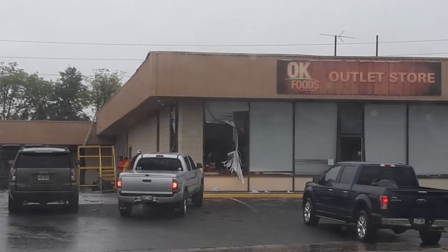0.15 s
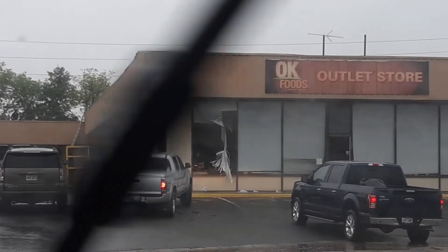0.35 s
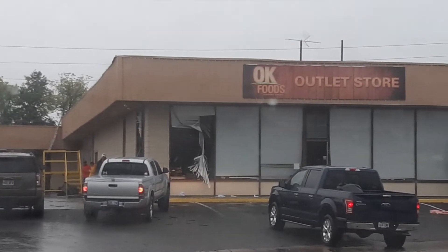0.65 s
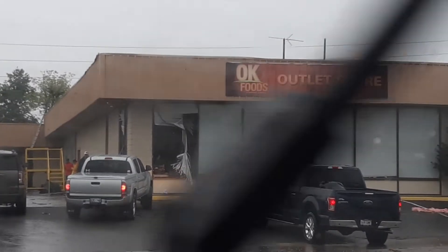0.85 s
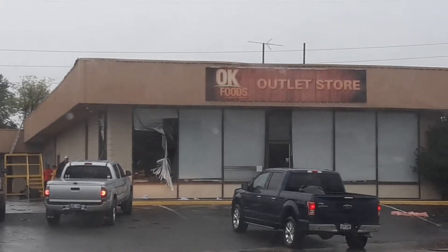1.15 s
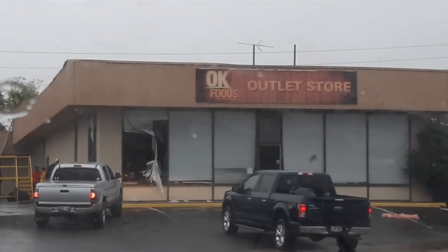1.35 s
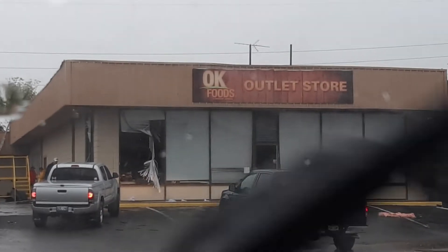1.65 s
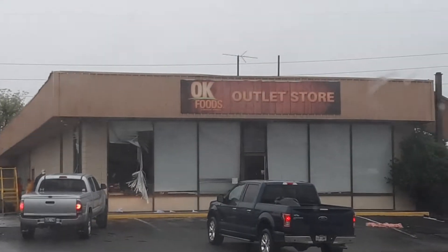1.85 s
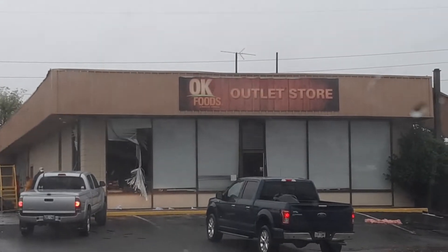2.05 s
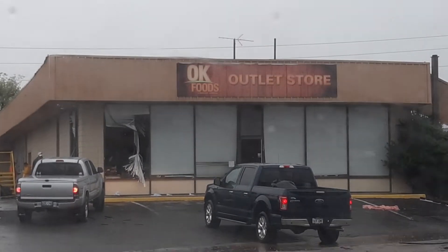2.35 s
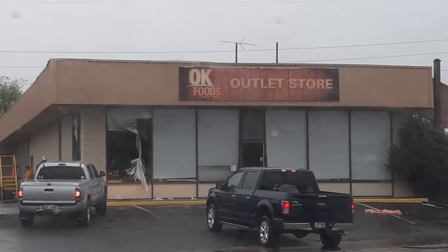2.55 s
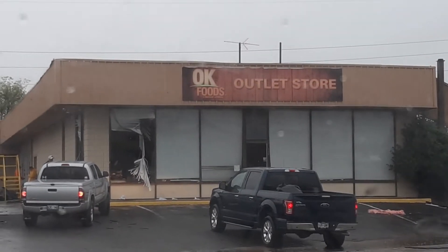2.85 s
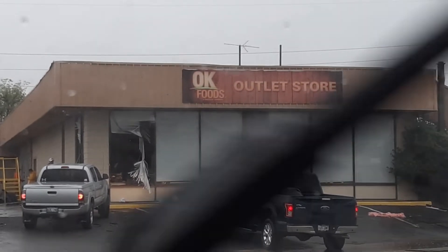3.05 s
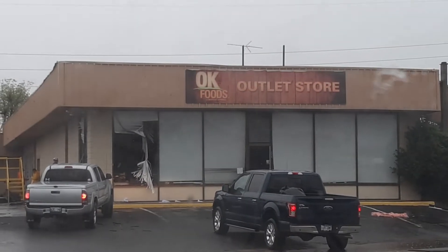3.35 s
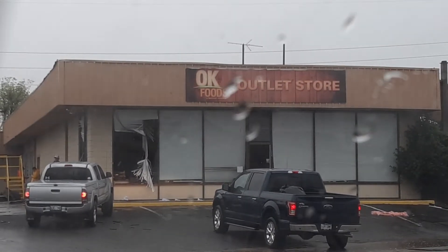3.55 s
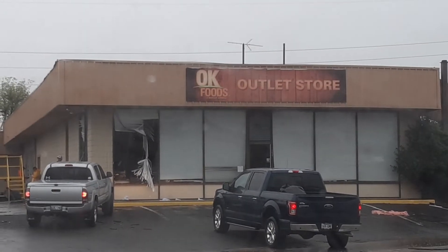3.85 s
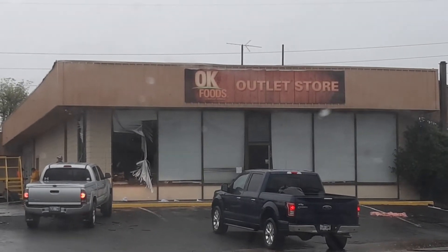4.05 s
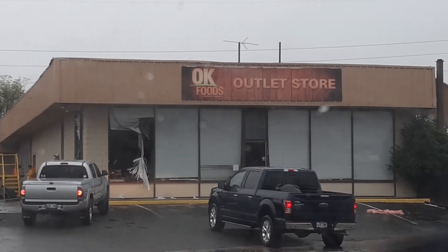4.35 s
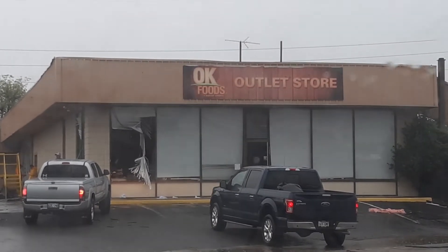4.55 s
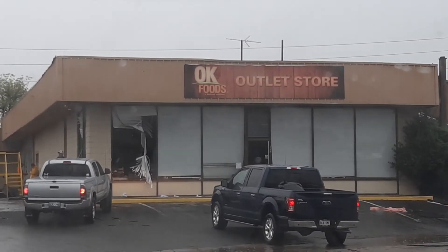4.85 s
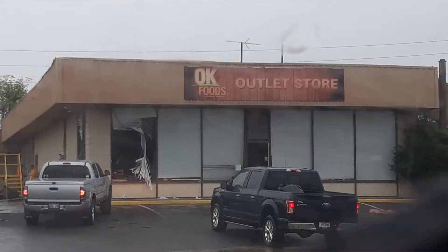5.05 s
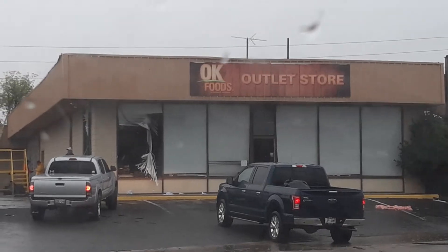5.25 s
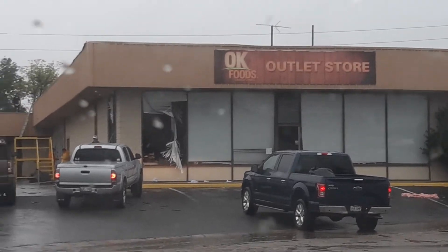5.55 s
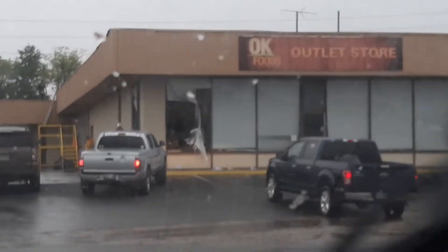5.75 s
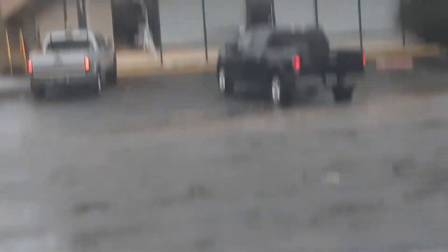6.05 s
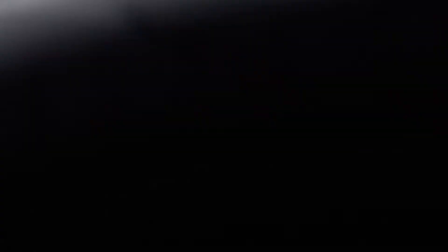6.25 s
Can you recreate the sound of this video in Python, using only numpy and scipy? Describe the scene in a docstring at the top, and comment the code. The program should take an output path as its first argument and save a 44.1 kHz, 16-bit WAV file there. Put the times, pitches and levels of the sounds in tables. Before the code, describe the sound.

Inside an idling car in the rain, wiper blades thump, then groan and judder across wet glass every second and a half while drops tick.

```python
"""Inside a parked car in the rain, two microphones in the cabin, the engine idling as a firing tone over noise.
The wiper blades set off with a thump, rub and judder over wet glass as clicks ringing its modes, and thump
again as they turn. Drops tick on glass and roof as noise bursts; close to the microphones a jacket rustles
and snaps, made of crackles and clicks. Something small and metallic rattles once, as clicks through resonances."""
import sys
import numpy as np
from scipy import signal
from scipy.fft import rfft, irfft, next_fast_len
from scipy.io import wavfile

SR = 44100
rng = np.random.default_rng(int(sys.argv[2]) if len(sys.argv) > 2 else 0)


def inscribe(sig):
    """Save sig as 16-bit PCM at rate SR to the path in sys.argv[1].

    A 1-D sig is mono; a 2-D sig holds one channel per row.
    Samples are clipped to [-1, 1] before scaling.
    """
    pcm = np.round(np.clip(np.atleast_2d(sig).T, -1, 1) * 32767)
    wavfile.write(sys.argv[1], SR, pcm.astype(np.int16))


N = 282681  # length in samples


def amp(db):
    """Decibels to gain."""
    return 10 ** (np.asarray(db) / 20)


def rms_one(x):
    """Scaled to unit rms."""
    return x / np.sqrt(np.mean(x ** 2) + 1e-20)


def in_time(rows):
    """Columns of a curve table, one value a sample."""
    s, *columns = np.transpose(rows)
    t = np.arange(N) / SR
    return [np.interp(t, s, column) for column in columns]


def passing(rows):
    """Gain of a level curve, silent outside it."""
    t = np.arange(N) / SR
    return amp(in_time(rows)[0]) * (t >= rows[0][0]) * (t < rows[-1][0])


def at_hz(points, hz):
    """Value of a spectrum table, log-frequency axis."""
    points = np.array(points)
    return np.interp(np.log(hz), np.log(points[:, 0]), points[:, 1])


def coloured(x, spectrum):
    """Filtered by the causal (minimum-phase) response of a spectrum table."""
    log_gain = np.log(amp(at_hz(spectrum, np.fft.rfftfreq(8192, 1 / SR) + 1)))
    # folding the cepstrum onto positive time makes the response causal
    cepstrum = irfft(log_gain)
    cepstrum[1:4096] *= 2
    cepstrum[4097:] = 0
    response = irfft(np.exp(rfft(cepstrum)))
    return signal.fftconvolve(np.atleast_2d(x), response[None], axes=1)[:, :N]


def modes(x, table):
    """Parallel resonances of alternating sign."""
    out = 0
    for k, (hz, width_hz, level_db) in enumerate(table):
        r = np.exp(-np.pi * width_hz / SR)
        b = (1 - r * r) / 2 * np.array([1, 0, -1])
        a = [1, -2 * r * np.cos(2 * np.pi * hz / SR), r * r]
        out = out + (-1) ** k * amp(level_db) * signal.lfilter(b, a, x)
    return out


def drift(rate_hz):
    """Slow random wander of spread 1, drawn at every 40th sample."""
    r = np.exp(-80 * np.pi * rate_hz / SR)
    noise = rng.standard_normal(N // 40 + 2002)
    slow = signal.lfilter([1], [1, -2 * r, r * r], noise)[2000:]  # past the settling
    return np.interp(np.arange(N) / 40, np.arange(len(slow)), rms_one(slow))


def grains(per_s, spread_db):
    """Random clicks of uneven size and random sign."""
    sizes = amp(spread_db * np.minimum(rng.exponential(1, N), 4)) * rng.choice([-1, 1], N)
    return sizes * (rng.random(N) < per_s / SR)


def add(out, s, sound):
    """Mixes a short sound in at s seconds."""
    i = max(round(s * SR), 0)
    out[..., i:i + sound.shape[-1]] += sound[..., :N - i]


def bursts(events, attack_s):
    """Envelope of short bursts from rows of (s, dB, t60 s)."""
    out, t = np.zeros(N), np.arange(round(.2 * SR)) / SR
    for s, level_db, t60 in events:
        add(out, s, (1 - np.exp(-t / attack_s)) * amp(level_db - 60 * t / max(t60, .005)))
    return out


# How alike the two microphones hear a sound. Each row: Hz, left-right likeness from 0 to 1.
LIKENESS = [(40, .9992), (80, .997), (180, .975), (300, .986), (600, .983), (1200, .8), (4000, .88),
            (15000, .82)]


def wide(x):
    """Two channels of a random excitation; what they do not share is the same grains with new signs."""
    share = [(hz, 10 * np.log10(np.clip((1 - c) / (1 + c), 1e-4, 1))) for hz, c in LIKENESS]
    difference = coloured(x * rng.choice([-1, 1], N), share)
    return x + difference * np.array([[1], [-1]])


# Level of the idle's firing tone in the cabin. Each row: time in seconds, level in dB.
FIRING_LEVEL = [(0.0, -47), (0.09, -43), (0.3, -49), (1.98, -45), (2.08, -48), (3.21, -49), (3.55, -47),
                (3.78, -42), (4.28, -50), (5.24, -44), (5.61, -51), (5.79, -46), (6.35, -41), (6.4, -50)]
# Overtones of the firing tone. Each row: multiple of the firing rate, level in dB re the firing tone.
FIRING_OVERTONES = [(2, -14), (3, -15)]
# Colour of engine rumble and fine rain inside the car. Each row: Hz, relative dB per Hz.
CABIN_COLOUR = [(26, -54), (45, -9.5), (122, 7), (237, -7.5), (405, -7), (505, -12), (676, -11.5),
                (822, -27.5), (976, -18.5), (1890, -28.5), (4120, -30), (6880, -35), (7970, -44.5),
                (10900, -39.5), (15400, -41.5)]
# Faint hum in the cabin. Each row: Hz, width in Hz, relative level in dB.
HUM_MODES = [(476, 28, 11), (744, 27, -10)]
IDLE_HZ, CABIN_DB = 40.4, -38  # mean firing rate; level of the rumble and rain bed


def engine():
    """Firing tone with two overtones over a lumpy rumble that gives way to fine rain hiss higher up."""
    level_db, = in_time(FIRING_LEVEL)
    turn = 2 * np.pi * np.cumsum(IDLE_HZ + 0.535 * drift(3.0)) / SR
    overtones = sum(amp(db + 1.7 * drift(5.3)) * np.sin(k * turn) for k, db in FIRING_OVERTONES)
    tone = np.sin(turn) + overtones
    air = wide(rng.standard_normal(N))
    bed = rms_one(coloured(air, CABIN_COLOUR)) * amp(1.3 * drift(9))
    hum = amp(-13.5) * rms_one(modes(air, HUM_MODES))
    return np.sqrt(2) * amp(level_db) * tone + amp(CABIN_DB) * (bed + hum)


# The jacket moving near the microphones. Each row: time in seconds, level in dB.
RUSTLE_LEVEL = [(0, -47), (0.33, -41.5), (0.6, -48), (0.9, -47), (1.3, -50), (1.75, -43.5), (2.05, -46.5),
                (2.22, -61), (2.4, -70)]
# Colour of the creasing cloth. Each row: Hz, relative dB per Hz.
RUSTLE_COLOUR = [(880, -64), (1500, -28), (1980, -2), (2560, -5), (3740, 7.5), (4130, 5.5), (5460, -10),
                 (6600, -8.5), (7630, -56), (9910, -11.5), (13000, -42)]
# The sleeve catches. Each row: start in seconds, level in dB, 60 dB decay time in seconds.
SLEEVE_CATCHES = [(5.94, -35, 0.13), (5.995, -28.5, 0.14), (6.043, -37.5, 0.19)]
# The sleeve slides past. Each row: time in seconds, level in dB.
SLEEVE_LEVEL = [(5.93, -42), (5.99, -43), (6.04, -48), (6.08, -40.5), (6.165, -38), (6.18, -47),
                (6.22, -50)]
# Bright colour of the sliding sleeve. Each row: Hz, relative dB per Hz.
SLEEVE_COLOUR = [(2650, -8.5), (4500, -5.5), (5040, -3.5), (6520, -3.5), (7520, -23), (9130, -12),
                 (10200, -10), (14000, -27)]


def jacket():
    """Stiff cloth creases in clumps of tiny crackles; a sleeve catches three times and slides by with a hiss."""
    clumps = amp(6.5 * drift(25))
    crackles = wide(grains(2500 * clumps, spread_db=6.0))
    rustle = passing(RUSTLE_LEVEL) * rms_one(coloured(crackles, RUSTLE_COLOUR))
    fibres = wide(grains(14000, spread_db=4.5))
    dull = rms_one(modes(fibres, [(3440, 770, 1.0), (5400, 1400, -7.5)]))
    bright = rms_one(coloured(fibres, SLEEVE_COLOUR))
    catches = bursts(SLEEVE_CATCHES, attack_s=0.0023) * dull
    slide = passing(SLEEVE_LEVEL) * bright
    return (rustle + catches + slide) * amp([[-.7], [.7]])  # a little to the right


# Rubbing strokes of the blades.
# Each row: start in seconds, length in seconds, then level, grip and singing in dB re the usual stroke.
STROKES = [(0.009, 0.57, 0.7, 2, 3.5), (1.39, .57, 0.46, 2.5, 4.5), (2.767, 0.593, -0.7, 2.5, 5),
           (4.144, 0.555, 0.4, 0, -5), (5.527, 0.58, 0, 2, -2)]


def current(t):
    """Seconds since the latest stroke began, and the rest of that stroke's row."""
    rows = np.array(STROKES)
    latest = np.maximum(np.searchsorted(rows[:, 0], t) - 1, 0)
    row = rows[latest].T
    return t - row[0], row[1:]


# Seconds into a stroke: the rubber grips ever harder, then lets go; the grip fades over SLIP_S.
GRIP_FROM_S, GRIP_FULL_S, LET_GO_S, SLIP_S = 0.11, 0.31, 0.3495, 0.095
ATTACK_S, RELEASE_S = 0.04, 0.047  # the blade gets going; it stops
# The singing mode builds up later and is choked within SING_STOP_S.
SING_FROM_S, SING_FULL_S, SING_STOP_S = .2, 0.28, 0.027


def stroke(since, length_s):
    """Contact, grip and singing build-up (all 0-1) by seconds since the start of a stroke."""
    contact = np.clip(np.minimum(since / ATTACK_S, 1 - (since - length_s) / RELEASE_S), 0, 1)
    gripping = (since - GRIP_FROM_S) / (GRIP_FULL_S - GRIP_FROM_S)
    held = 1 - (since - LET_GO_S) / SLIP_S
    grip = np.clip(np.minimum(gripping, held), 0, 1)
    building = (since - SING_FROM_S) / (SING_FULL_S - SING_FROM_S)
    choked = 1 - (since - LET_GO_S) / SING_STOP_S
    sing = np.clip(np.minimum(building, choked), 0, 1)
    return contact, grip, sing


def steadied(x, share):
    """Friction feeds a ring that fades and brakes one that grows, which evens its height."""
    height = np.abs(signal.hilbert(x.mean(axis=0), next_fast_len(N)))[:N]
    return rms_one(x / (height / height.mean() + 0.087) ** np.clip(share, 0, 1))


# Low modes of the glass. Each row: Hz, width in Hz, relative level in dB.
GROAN_MODES = [(184, 138, -9), (263.6, 36, -1.5), (306.2, 25.7, -1), (352.6, 40.7, -2.5), (383.4, 81, -8.5)]
# Higher modes of the glass. Each row: Hz, width in Hz, relative level in dB.
UPPER_MODES = [(464, 66, -13), (620, 163, 3), (689, 71, 4.5)]
# The mode that sings at full blade speed. Each row: Hz, width in Hz, relative level in dB.
SINGING_MODE = [(549.4, 35, 0)]
# Colour of the blade's swish. Each row: Hz, relative dB per Hz.
SWISH_COLOUR = [(470, -24.5), (800, 3), (1200, -1.5), (1270, -7.5), (2220, -11), (2590, -16.5),
                (3880, -14.5), (6580, -26), (7810, -40.5), (9000, -32.5), (11700, -63), (19800, -120)]
GROAN_DB, UPPER_DB, SINGING_DB, SWISH_DB = -29, -38, -45.5, -48  # light rubbing
# Usual rise at full grip, or at full build-up for the singing.
GROAN_GRIP_DB, UPPER_GRIP_DB, SINGING_GRIP_DB, SWISH_GRIP_DB = 5, 5.5, 16.5, 11
SAG_DB_PER_S = 4  # the groan sinks after the rubber lets go
UNEVEN_DB = 1  # the wet glass is patchy


def wipers():
    """Dense stick-slip of rubber on glass rings the glass."""
    since, (length_s, level_db, grip_db, singing_db) = current(np.arange(N) / SR)
    contact, grip, sing = stroke(since, length_s)
    slips, more_slips = wide(grains(2500, spread_db=1.5)), wide(grains(2500, spread_db=2.5))
    groan = steadied(modes(modes(slips, [(283, 500, 0)]), GROAN_MODES), share=0.31)
    upper = rms_one(modes(modes(slips, [(596, 480, 0)]), UPPER_MODES))
    singing = steadied(modes(modes(more_slips, SINGING_MODE), SINGING_MODE), share=0.49)
    swish = rms_one(coloured(wide(grains(4000, spread_db=3.0)), SWISH_COLOUR))
    sag_db = SAG_DB_PER_S * np.maximum(since - LET_GO_S, 0)
    out = groan * amp(GROAN_DB + (GROAN_GRIP_DB + grip_db) * grip - sag_db)
    out = out + upper * amp(UPPER_DB + UPPER_GRIP_DB * grip)
    out = out + singing * amp(SINGING_DB + (SINGING_GRIP_DB + singing_db) * sing)
    out = out + swish * amp(SWISH_DB + (SWISH_GRIP_DB + grip_db) * grip + 3.26 * drift(21))
    return contact * amp(level_db + UNEVEN_DB * drift(14.6)) * out


def swell(hz, rise_s):
    """A soft push: a ring whose envelope swells to 1 in rise_s and dies away."""
    t = np.arange(round(.15 * SR)) / SR
    envelope = (t / rise_s * np.exp(1 - t / rise_s)) ** 2
    return envelope * np.sin(2 * np.pi * hz * t)


# The linkage takes up its slack at each end of the sweep.
# Each row: start in seconds, level of the main ring in dB, ring in Hz.
THUMPS = [(0.04, -19.5, 148), (0.724, -22, 161), (1.413, -21.5, 128.5), (2.108, -28, 158),
          (2.136, -25, 119), (2.785, -18, 136.4), (3.492, -26, 102), (3.518, -27, 131), (4.175, -23, 132),
          (4.86, -26.5, 145.4), (4.889, -26.5, 117), (5.551, -20.5, 142), (6.233, -25, 164),
          (6.268, -28.5, 131)]
# Loose linkage shaking with each thump. Each row: Hz, width in Hz, relative level in dB.
KNOCK_MODES = [(110, 67, -4), (189, 100, 3), (298, 107, -2), (520, 190, -15.5)]
THUMP_RISE_S = .013
KNOCK_DB, KNOCK_T60_S = -10.5, 0.23  # level re the thump, decay


def thumps():
    """Slack taken up gives three soft pushes at once, while the loose linkage shakes, dying away more slowly."""
    out = np.zeros((2, N))
    for s, level_db, hz in THUMPS:
        ring = swell(hz, THUMP_RISE_S)
        ring = ring + 0.34 * swell(2.183 * hz, 0.58 * THUMP_RISE_S)
        ring = ring + 0.069 * swell(.55 * hz, 2.3 * THUMP_RISE_S)
        add(out, s, amp(level_db) * ring)
    shaking = bursts([(s, db + KNOCK_DB, KNOCK_T60_S) for s, db, _ in THUMPS], attack_s=0.0046)
    return out + shaking * rms_one(modes(wide(grains(800, spread_db=1.0)), KNOCK_MODES))


def surge(hz, length_s):
    """A ring that friction builds up and then chokes: envelope height 1, as slow to rise as to fall."""
    t = np.arange(round(.08 * SR)) / SR
    return np.sin(np.pi * np.minimum(t / length_s, 1)) ** 2 * np.sin(2 * np.pi * hz * t)


# The blade sticks and jumps. Each row: marked moment in seconds, low ring's peak in dB, its mean Hz,
# singing mode in dB, grit in dB.
JUDDER = [(0.185, -13.5, 305, -36, -40), (0.258, -9, 324, -17, -25.5), (0.308, -20, 297, -19, -31),
          (0.337, -18, 291, -14.5, -35), (0.365, -12, 290, -29, -38), (0.525, -26, 302, -42, -51),
          (1.462, -18.5, 310, -30, -44), (1.58, -18, 287, -36, -31.5), (1.693, -12, 280, -20, -46),
          (1.739, -14.5, 278, -34, -50), (1.905, -23, 302, -28.5, -41), (2.97, -16, 327, -44, -48),
          (3.025, -11.5, 305, -42, -32), (3.092, -13.5, 303, -26, -35), (3.117, -11.5, 305, -25, -40),
          (4.336, -17, 302, -25.5, -34.5), (4.403, -7.5, 304, -15.5, -24.5), (4.424, -26, 328, -30, -47),
          (4.465, -11, 284, -17, -35), (4.499, -14.5, 285, -29, -30), (4.63, -29, 302, -31, -48),
          (5.712, -14.5, 317, -30, -58), (5.746, -13.5, 282, -24, -59), (5.779, -7, 279, -30, -31),
          (5.864, -17.5, 289, -19.5, -32), (6.08, -22.5, 287, -39, -44)]
# What a jump scrapes up. Each row: Hz, width in Hz, relative level in dB.
GRIT_MODES = [(860, 100, 10), (1125, 160, 1.5), (2150, 91, -1), (3980, 1300, -13.5)]
GRIT_RISE_S, JUMP_LEAD_S = 0.0074, .006  # a jump builds up before its marked moment


def jumps():
    """Each jump rings the low and the singing mode and scrapes a burst of grit."""
    out, grit, t = np.zeros((2, N)), np.zeros(N), np.arange(round(.08 * SR)) / SR
    out_of_tune = np.array([[1.003], [.997]])  # each microphone favours another part of the glass
    scrape = t / GRIT_RISE_S * np.exp(1 - t / GRIT_RISE_S)
    for s, peak_db, hz, singing_db, grit_db in JUDDER:
        start_s = s - JUMP_LEAD_S
        add(out, start_s, amp(peak_db) * surge(hz * out_of_tune, length_s=0.033))
        add(out, start_s, amp(singing_db) * surge(SINGING_MODE[0][0], length_s=0.05))
        add(grit, start_s, amp(grit_db) * scrape)
    return out + grit * rms_one(modes(wide(grains(4200, spread_db=4.5)), GRIT_MODES))


def patter(per_s, level_db, t60):
    """Envelope of random small drops, each dying away by 60 dB in t60 seconds."""
    hits = np.abs(grains(per_s, spread_db=3.5))
    return signal.lfilter([1], [1, -amp(-60 / (t60 * SR))], hits) * amp(level_db)


# Ticks on the car: large drops, except the one at 0.259 s, which is grit scraped up by the jumping blade.
# Each row: start in seconds, body in dB, top in dB.
TICKS = [(0.0877, -39, -58), (0.2288, -27, -34), (0.259, -30, -57), (0.443, -46, -52), (0.49, -38, -54),
         (0.5065, -33, -44), (0.5376, -31, -36), (0.6827, -35.5, -46), (0.7745, -38, -43),
         (0.867, -32.5, -35.5), (1.033, -46, -54), (1.179, -31.5, -36), (1.281, -42, -56),
         (1.347, -35, -42), (1.423, -35.5, -41), (1.509, -29, -36), (1.7594, -33, -38), (1.7894, -35, -52),
         (1.8195, -34, -47), (1.98, -37, -59), (2.073, -34, -67), (2.151, -33, -42), (2.222, -39, -46),
         (2.4306, -35, -37), (2.4594, -34, -37), (2.536, -38.5, -55), (2.603, -43, -60), (3.0495, -35, -41),
         (3.099, -33, -38), (3.273, -40, -60), (3.3238, -38.5, -43), (3.4312, -34, -37),
         (3.528, -35.5, -45), (3.711, -35.5, -45), (3.7418, -33.5, -37), (3.841, -43, -45),
         (3.959, -42, -43), (4.072, -32.5, -37), (4.1862, -36.5, -42), (4.2642, -42, -46),
         (4.3836, -35, -37), (4.599, -48, -36), (4.714, -37, -42), (5.026, -37, -39), (5.1785, -41, -46),
         (5.3094, -52, -45), (5.355, -31.5, -37), (5.664, -36, -35.5), (5.78, -31, -41),
         (6.3064, -37, -36.5)]
# The microphone turns, moving where the ticks fall. Each row: time in seconds, left-right in dB.
TURNING = [(0, -0.5), (1.4, -2.5), (2.4, 1.5), (5.3, 1), (6.4, 1)]
# Colour of a splash. Each row: Hz, relative dB per Hz.
SPLASH_COLOUR = [(410, -53), (700, -2), (839, 6), (1170, -2.5), (1530, -5.5), (4490, 4.5), (4840, 2),
                 (5930, -6.5), (6670, -4), (9000, -47), (11700, -93.5), (19800, -120)]
# What a drop rings in glass and roof. Each row: Hz, width in Hz, relative level in dB.
PANE_MODES = [(2240, 190, -3), (4160, 113, 6), (5050, 60, -16.5), (6520, 130, -13.5)]
# Top of a splash. Each row: Hz, relative dB per Hz.
SPRAY_COLOUR = [(8000, -14), (9500, -9), (11000, -1.5), (13500, -16), (15500, 0.5)]
TICK_T60_S = 0.068
SPOT_DB = 7  # drops land on different spots, which favour different modes


def rain_and_grit_tick():
    """Large drops, and one tick of blade grit, are noise bursts that ring the panes; small drops patter."""
    side = amp(in_time(TURNING)[0] / 2 * np.array([[1], [-1]]))
    body = side * bursts([(s, db, TICK_T60_S) for s, db, _ in TICKS], attack_s=0.0018)
    top = side * bursts([(s, db, TICK_T60_S) for s, _, db in TICKS], attack_s=0.001)
    small = patter(45, level_db=-58.5, t60=0.051) + patter(30, level_db=-51, t60=0.019)
    spatter = wide(grains(6000, spread_db=0.0))
    ringing = sum(amp(SPOT_DB * drift(22)) * modes(spatter, [mode]) for mode in PANE_MODES)
    splash = rms_one(rms_one(coloured(spatter, SPLASH_COLOUR)) + 0.5 * rms_one(ringing))
    spray = rms_one(coloured(wide(rng.standard_normal(N)), SPRAY_COLOUR))
    return (body + small) * splash + (top + small * amp(-5.0)) * spray


# Creases of the jacket snapping near the microphones. Each row: start in seconds, click level in dB.
SNAPS = [(0.641, -33), (0.798, -23.5), (0.907, -20), (0.989, -28), (1.067, -22.5), (1.152, -18.5),
         (1.3856, -21), (1.5933, -23.5), (1.631, -17), (5.921, -10)]


def snaps():
    """Single clicks through the colour of the cloth, with a short ring in the cabin."""
    clicks, t = np.zeros(N), np.arange(round(.03 * SR)) / SR
    for s, level_db in SNAPS:
        # noise falling 60 dB in 14 ms
        add(clicks, s, amp(level_db - 60 * t / 0.014) * rng.standard_normal(len(t)))
    cloth = [(3630, 890, 0.5), (6130, 1440, -4), (9350, 3100, -13.5)]  # Hz, width Hz, dB
    return modes(wide(clicks), cloth) * amp([[-.7], [.7]])


def treble(x):
    """Only the highest hiss, above 10 kHz."""
    return signal.sosfilt(signal.butter(4, 10000, "high", fs=SR, output="sos"), x)


# Small metal parts chattering in the car.
# Each row: start in seconds, body in dB, top in dB, 60 dB decay time in seconds.
RATTLE = [(2.652, -35, -58, 0.05), (2.6663, -23.5, -43, 0.084), (2.6917, -26.5, -52, 0.09),
          (2.7075, -21.5, -48, 0.04), (2.769, -42, -60, 0.18), (2.79, -40, -38, 0.093),
          (2.7995, -27.5, -43, 0.066), (2.818, -40, -21, 0.021), (2.853, -48, -71, 0.27)]
# Ringing of the metal. Each row: Hz, width in Hz, relative level in dB.
RATTLE_MODES = [(3330, 590, -7), (3650, 125, 6.5), (4050, 110, 1.5), (5500, 150, -4), (6440, 210, -5),
                (10040, 410, -13)]


def rattle():
    """Small metal parts chatter against each other: bursts of dense clicks ring them."""
    body = bursts([(s, db, t60) for s, db, _, t60 in RATTLE], attack_s=0.0034)
    top = bursts([(s, db, t60) for s, _, db, t60 in RATTLE], attack_s=0.002)
    clicks = wide(grains(5000, spread_db=3.0))
    clatter = [(2000, -14), (3800, 0.0), (5600, -4.0), (6800, -6.0), (8500, -13),
               (10500, -2.5), (13000, -28)]  # Hz, dB per Hz
    broad = coloured(clicks, clatter)
    ringing = rms_one(modes(clicks, RATTLE_MODES)) + 0.71 * rms_one(broad)
    return (body * ringing + top * rms_one(treble(clicks))) * amp([[-1.5], [1.5]])  # to the right


def scene():
    """All sources in the cabin."""
    return engine() + jacket() + wipers() + thumps() + jumps() + rain_and_grit_tick() + snaps() + rattle()


# Balance of the two microphones. Each row: Hz, left-right in dB.
LEANING = [(400, -0.1), (1000, -1.5), (2500, -2.6), (6000, -2.4), (12000, .4)]
CUTOFF_HZ = 16000  # from here up, at least 60 dB down


def record(dry):
    """The two microphones lean right in the upper middle; the top is cut."""
    leaned = []
    for x, side in zip(dry, (1, -1)):
        leaned.append(coloured(x, [(hz, side * db / 2) for hz, db in LEANING])[0])
    return signal.sosfilt(signal.cheby2(14, 60, CUTOFF_HZ, fs=SR, output="sos"), leaned)


dry = scene()
out = record(dry)
inscribe(out)
```